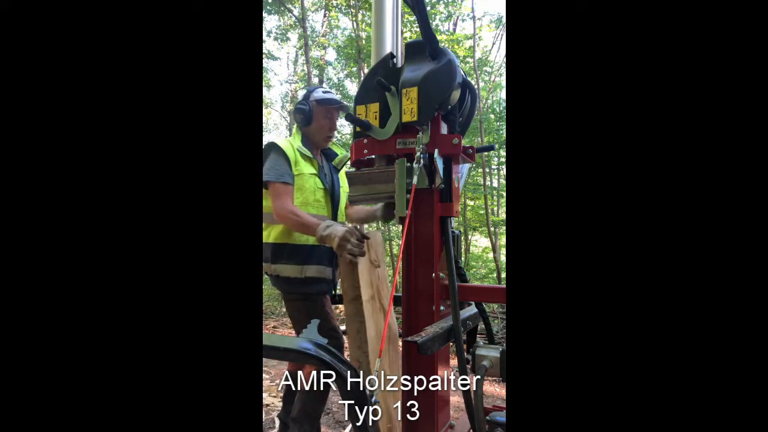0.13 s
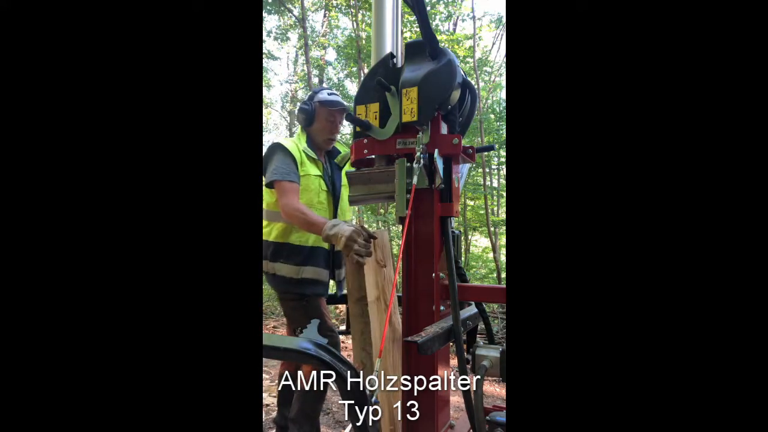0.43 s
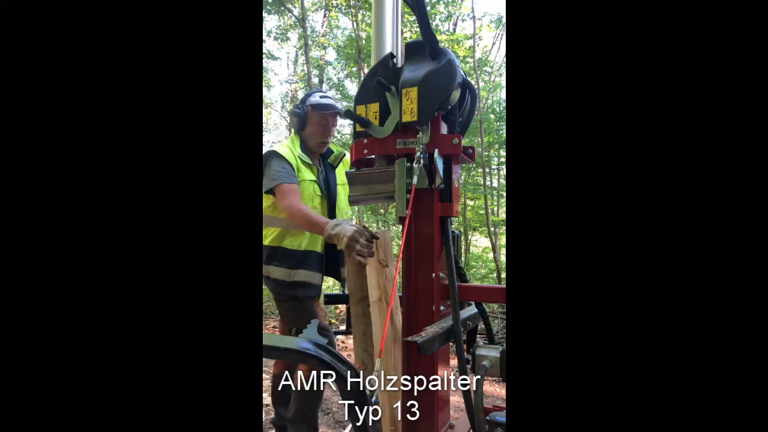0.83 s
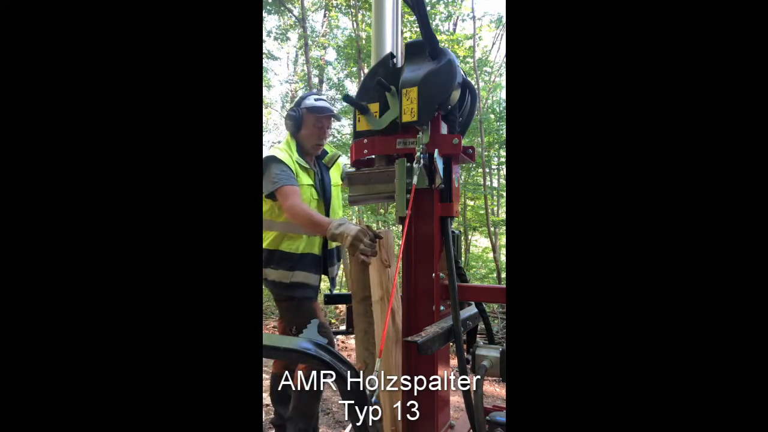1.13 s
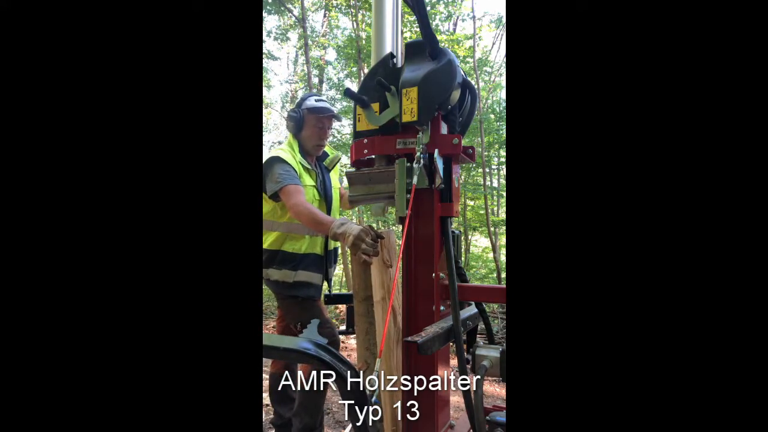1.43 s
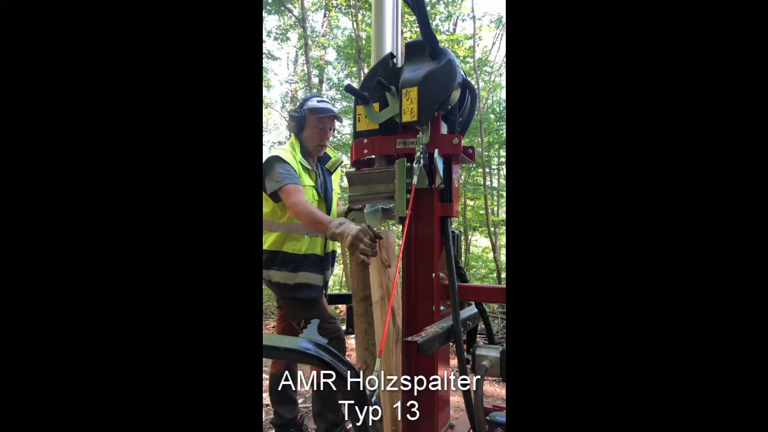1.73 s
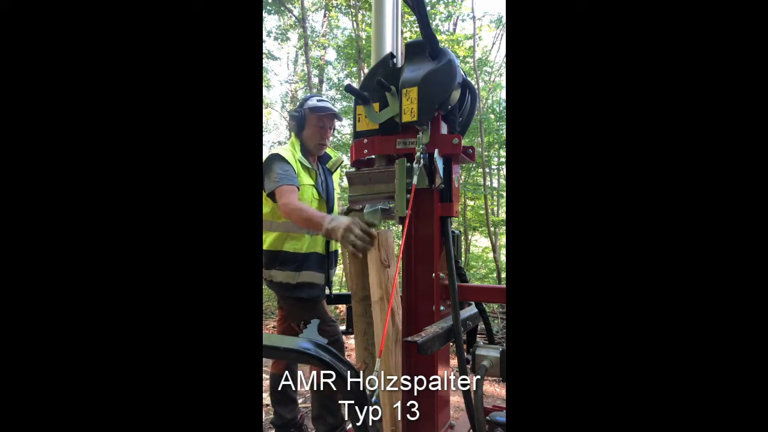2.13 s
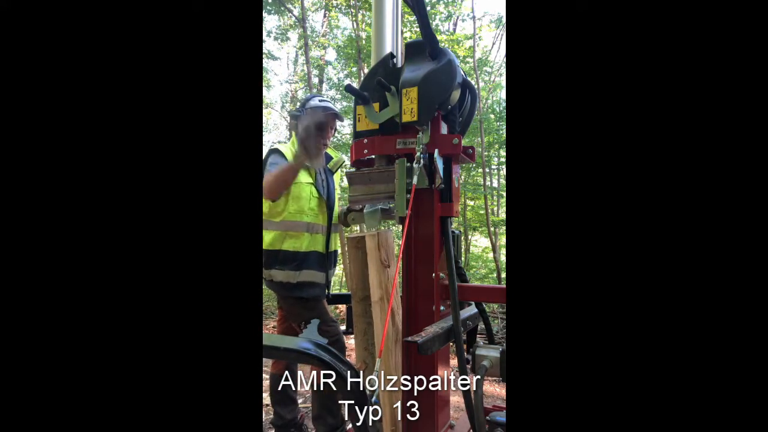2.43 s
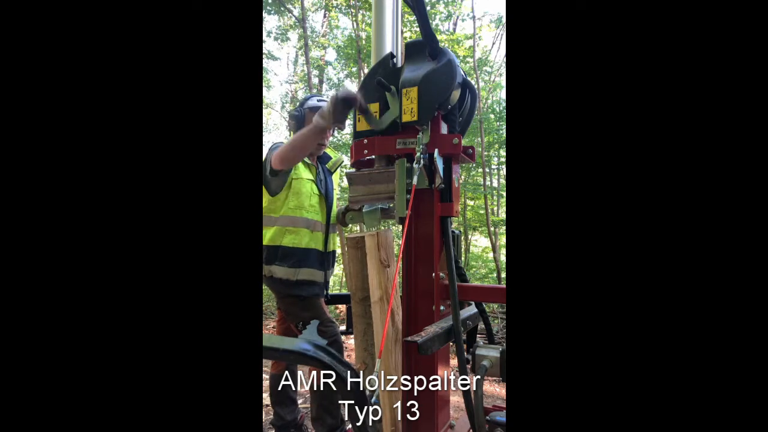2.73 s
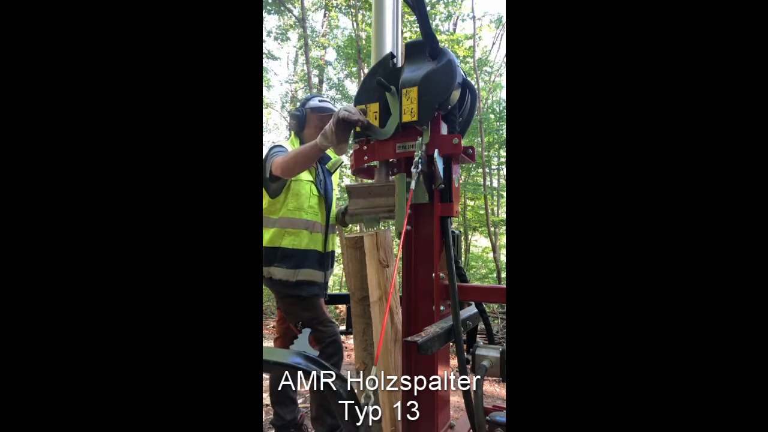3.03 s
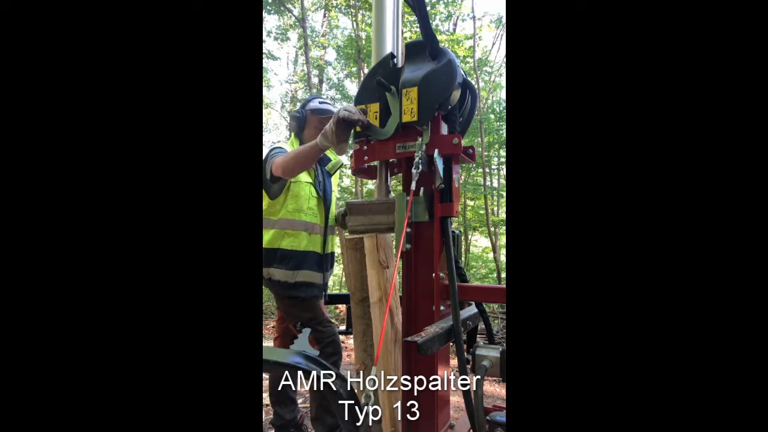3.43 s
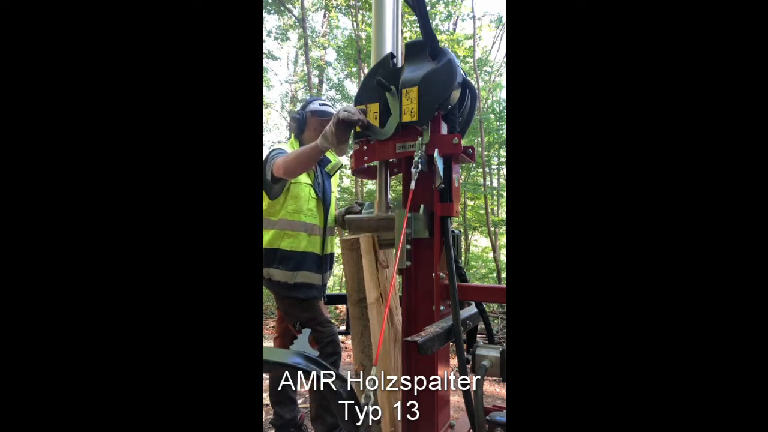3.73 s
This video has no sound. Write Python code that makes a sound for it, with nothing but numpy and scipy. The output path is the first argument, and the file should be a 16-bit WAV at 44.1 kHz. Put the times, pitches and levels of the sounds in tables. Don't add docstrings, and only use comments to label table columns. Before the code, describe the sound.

Log splitter engine chugs and whines, a lever clinks, oil hisses, and a log tears apart

```python
import sys
import numpy as np
from scipy import signal
from scipy.fft import irfft
from scipy.io import wavfile

SR = 44100
rng = np.random.default_rng(int(sys.argv[2]) if len(sys.argv) > 2 else 0)


def int16_out(signal):
    q = np.round(np.clip(np.atleast_2d(signal).T, -1, 1) * 32767)
    wavfile.write(sys.argv[1], SR, q.astype(np.int16))


def invert_db(x):
    u = np.asarray(x, float) / 20
    return 10 ** u


N = 170667

# time in seconds, speed in cycles per second.
ENGINE_SPEED = [
    (0, 11.508),
    (2.85, 11.508),
    (3.05, 11.33),
    (3.3, 11.1),
    (3.6, 10.8),
    (3.87, 10.5),
]
# time in seconds, load from 0 to 1.
HYDRAULIC_LOAD = [
    (0, 0.54),
    (2.72, 0.5),
    (2.9, 1),
    (3.1, 1),
    (3.4, 1),
    (3.87, 1),
]
# multiple of the cycle rate, level in dB.
EXHAUST_ORDERS = [(3, -47), (6, -29), (9, -37), (12, -39), (13, -40), (14, -48), (15, -42), (16, -48),
                  (18, -45), (20, -47), (21, -50), (22, -42), (23, -43), (24, -43), (25, -47), (35, -48),
                  (29, -47), (30, -42), (31, -50), (33, -51), (34, -51), (39, -50), (41, -50), (42, -49),
                  (43, -46), (44, -44), (45, -50)]
# multiple of the cycle rate, level in dB.
GEAR_AND_VALVE_ORDERS = [(47, -48), (48, -46), (50, -49), (51, -49), (52, -51), (59, -50), (62, -50), (64, -50),
                         (65, -49), (66, -53), (73, -52), (79, -51), (80, -49), (82, -51), (83, -47), (86, -49),
                         (90, -50), (94, -51), (101, -49), (105, -50), (108, -50), (114, -47), (118, -46), (125, -47),
                         (128, -52), (129, -47), (132, -49), (135, -51), (136, -51), (138, -52),
                         (147, -53), (149, -53), (151, -55), (154, -53), (159, -57), (166, -55), (171, -56),
                (175, -56), (177, -54), (179, -55), (182, -55), (189, -58), (196, -58), (205, -60),
                (212, -58), (227, -62), (268, -59), (277, -60)]
# frequency in Hz, level in dB.
CLATTER_SPECTRUM = [(150, -58), (400, -58), (900, -59), (1500, -59), (2000, -65), (3000, -70), (5000, -78)]
# frequency in Hz, level in dB per Hz.
NOISE_SPECTRUM = [(170, 1), (500, -7), (700, -16), (1400, -10.5), (2000, -17.5), (4000, -22.5), (9000, -30),
                  (15000, -35.5)]
# frequency in Hz, width in Hz, level in dB.
BLOCK_RESONANCES = [(3240, 120, -50.5), (12500, 200, -63), (2419, 61, -53)]
# time in seconds, pitch in Hz, level in dB.
PUMP_TONE = [(0, 1277.4, -35), (2.92, 1277.4, -35), (3.0, 1275, -41), (3.87, 1270, -42)]
# time in seconds, pitch in Hz, level in dB.
LOADED_WHINE = [(3.14, 556, -46), (3.19, 552, -34.5), (3.36, 542, -34.5), (3.45, 536, -42),
                (3.62, 528, -36), (3.7, 522, -41), (3.8, 513, -50)]
# start in seconds, end in
# seconds, pitch in Hz, level in dB, pitch sag as a share per second.
WHISTLES_AND_HUMS = [(2.82, 3.0, 3195, -43, .01), (2.84, 3.05, 2792, -42, 0), (2.83, 3.07, 2355, -48, 0),
                     (2.96, 3.09, 5165, -46, .02), (2.92, 3.08, 3915, -46, .02), (3.05, 3.43, 3910, -41, .05),
                     (3.0, 3.42, 4345, -45, .09), (2.95, 3.12, 1495, -42, .03), (3.12, 3.4, 1430, -44, .06),
                     (2.9, 3.42, 6600, -50, .01), (3.0, 3.42, 7380, -51, .08), (2.85, 3.4, 5860, -56, 0),
                     (3.25, 3.46, 3090, -49, .02), (3.13, 3.4, 2290, -50, .04), (3.13, 3.4, 5150, -53, .02),
                     (3.7, 3.8, 980, -39, .02), (3.5, 3.69, 1060, -40, 0), (3.55, 3.68, 1175, -41, 0),
                     (3.38, 3.46, 1900, -40, 0), (2.74, 2.87, 279, -30.5, .02), (3.04, 3.3, 207, -37, .08),
                     (3.57, 3.73, 195, -38, .05), (3.08, 3.35, 395, -42, .05)]
# start in seconds, peak in dB, pitch in Hz.
FIBRE_SNAPS = [(3.411, -13, 3830), (3.44, -4, 4600), (3.4527, -12, 2810), (3.4595, -7, 4430),
               (3.4635, -13, 7000), (3.4689, -9, 6490), (3.476, -18, 3200), (3.479, -7, 4400),
               (3.483, -7.5, 6800), (3.491, -13, 3940), (3.497, -10, 9000), (3.502, -7, 6440),
               (3.513, -13, 8300), (3.524, -12, 4870), (3.529, -13, 6800), (3.541, -10, 4020),
               (3.5445, -6.5, 8800), (3.5506, -7, 7000), (3.555, -9, 9000), (3.5628, -13, 9000),
               (3.5734, -12.5, 3600), (3.581, -5.5, 5295), (3.602, -14, 8950), (3.6233, -7, 7200),
               (3.6692, -10.5, 10300), (3.6722, -10.5, 9500), (3.6965, -15, 9000), (3.701, -16, 12000),
               (3.7077, -13, 2960), (3.726, -6.5, 6840), (3.749, -13, 2550), (3.7943, -15, 9000),
               (3.806, -11, 4430), (3.81, -14, 10100), (3.811, -8, 4560), (3.8255, -19, 6200),
               (3.8285, -18, 9000), (3.831, -23, 8000), (3.844, -23, 10000), (3.849, -11, 3020),
               (3.8655, -15, 7000)]
# time in seconds, level in dB.
TEARING_LEVEL = [(3.39, -58), (3.432, -35), (3.47, -24), (3.55, -26), (3.6, -32), (3.66, -35), (3.73, -32),
                 (3.8, -31), (3.87, -29)]
# start in seconds, peak in dB, pitch in Hz.
DULL_KNOCKS = [(2.81, -16, 580), (2.806, -21, 990), (2.75, -17, 400), (2.765, -19, 580), (2.865, -19, 570),
               (2.89, -21, 1000), (2.94, -15, 500), (3.015, -16, 570), (3.368, -16, 600),
               (3.372, -18, 1300), (3.378, -19, 900), (3.388, -15, 620), (3.395, -15, 430),
               (3.44, -19, 1280), (3.468, -15, 670), (3.5, -15, 950), (3.503, -18, 640), (3.554, -16, 650),
               (3.595, -20, 520), (3.685, -20, 1050), (3.73, -21, 1100), (3.746, -18, 650),
               (3.75, -20, 1280), (3.755, -19, 420), (3.806, -17, 1280), (3.816, -19, 1000),
               (3.848, -23, 1000)]
# start in seconds, peak in dB.
LEVER_CLINKS = [
    (1.679, -19),
    (1.694, -19),
    (2.735, -26),
    (2.806, -15),
    (2.811, -17),
]
# frequency in Hz, level in dB, 60 dB decay in seconds.
LEVER_MODES = [(2100, -9, .02), (3200, 0, .03), (4750, -3, .015), (5680, -3, .02), (7500, -2, .015),
               (8480, 0, .02), (8830, -1, .025), (9970, -5, .02), (11650, -9, .02)]
# start in seconds, depth in dB, recovery in seconds.
LIMITER_DIPS = [(3.445, 3, .05), (3.47, 4, .05), (3.50, 4, .05), (3.542, 9, .055), (3.67, 6, .015),
                (3.698, 5, .015), (3.729, 12, .055), (3.785, 5, .02), (3.794, 13, .04), (3.827, 18, .025),
                (3.852, 8, .04)]

FIRING_AT = .73
GEARS_FADE_PER_S, LOAD_GEARS_DB = .3, -14
LOAD_EXHAUST_DB, LOAD_NOISE_DB = 1, 4
WOBBLE_DB, PATCHY_DB, CLATTER_UNEVEN_DB = .5, .67, 3
NOISE_DB, NOISE_LOW_CUT_HZ, RUMBLE_DB = -33, 330, -56
KNOCK_DB, KNOCK_WIDTH = 2, 1
PUMP_SWELL, PUMP_SWELL_AT = .3, .255
OIL_HISS_DB, OIL_LOW_HZ, OIL_HIGH_HZ = -38.5, 2700, 8300
GROAN_DB = -33
WHISTLE_WAVER, WHISTLE_FLICKER_DB = .0006, 1.3
CRACK_OCTAVES, SNAP_T60_S = .2, .011
SNAP_DB, RING_DB = -4.5, -7.5
TEAR_PER_S, TEAR_UNEVEN_DB = 3000, 3.5
KNOCK_T60_S, KNOCK_SPREAD = .12, .08
DUCK_ATTACK_S, LEFT_DB, CUTOFF_HZ = .004, 6, 16350


def rms_one(x):
    return x / np.sqrt(np.mean(x ** 2) + 1e-20)


def in_time(rows):
    s, *columns = np.transpose(rows)
    return [np.interp(np.arange(N) / SR, s, c) for c in columns]


def at_hz(points, hz):
    table_hz, db = np.transpose(points)
    return np.interp(np.log(hz), np.log(table_hz), db)


def drift(rate):
    r = np.exp(-80 * np.pi * rate / SR)
    slow = signal.lfilter([1], [1, -2 * r, r * r], rng.standard_normal(N // 40 + 2002))[2000:]
    return np.interp(np.arange(N) / 40, np.arange(len(slow)), rms_one(slow))


def ring(x, hz, t60):
    r, w = invert_db(-60 / (t60 * SR)), 2 * np.pi * hz / SR
    return signal.lfilter([0, np.sin(w)], [1, -2 * r * np.cos(w), r * r], x + 1e-18)


def band(x, low_hz, high_hz):
    sos = signal.butter(2, [low_hz, min(high_hz, .45 * SR)], "band", fs=SR, output="sos")
    return signal.sosfilt(sos, x)


def narrow(hz, width_hz):
    t60 = np.log(1000) / np.pi / width_hz
    once = ring(rng.standard_normal(N), hz, t60)
    return rms_one(ring(once, hz, t60))


def tone(hz):
    return np.sqrt(2) * np.sin(2 * np.pi * np.cumsum(hz) / SR)


def burst(s, t60):
    t = np.arange(6000) / SR
    return int(s * SR), rng.standard_normal(6000) * invert_db(-60 * t / t60)


def looped(levels_db, phases, cycle):
    table = irfft(invert_db(levels_db) * np.exp(1j * phases), 8192) * 8192 / np.sqrt(2)
    return np.interp(cycle % 1 * 8192, np.arange(8193), np.append(table, table[0]))


def engine(load):
    speed, = in_time(ENGINE_SPEED)
    cycle = np.cumsum(speed) / SR - FIRING_AT
    sag = np.clip((speed[0] - speed) / GEARS_FADE_PER_S, 0, 1)
    out = engine_orders(cycle, sag, load) + engine_noise(cycle, load) + pump(cycle)
    return out + invert_db(RUMBLE_DB) * rms_one(band(rng.standard_normal(N), 38, 103))


def engine_orders(cycle, sag, load):
    orders = np.arange(4097)
    chance = rng.uniform(0, 2 * np.pi, 4097)
    exhaust, gears = np.full((2, 4097), -200.)
    for table, levels in (EXHAUST_ORDERS, exhaust), (GEAR_AND_VALVE_ORDERS, gears):
        levels[[int(k) for k, _ in table]] = [db for _, db in table]

    clatter = at_hz(CLATTER_SPECTRUM, np.clip(orders * ENGINE_SPEED[0][1], 1, None))
    clatter = clatter + rng.normal(0, CLATTER_UNEVEN_DB, 4097)
    clatter -= 200 * ((orders < 7) | (orders > 500))
    clatter[(exhaust > -150) | (gears > -150)] = -200

    exhaust_phases = chance * ((orders > 25) | (exhaust < -46))
    out = invert_db(LOAD_EXHAUST_DB * load) * looped(exhaust, exhaust_phases, cycle)
    gear_level = invert_db(LOAD_GEARS_DB * sag + WOBBLE_DB * drift(3.1))
    out += gear_level * looped(gears, chance, cycle)
    return out + looped(clatter, chance, cycle)


def engine_noise(cycle, load):
    firing = np.exp(KNOCK_WIDTH * (np.cos(6 * np.pi * cycle) - 1))
    puff = invert_db(KNOCK_DB * firing + LOAD_NOISE_DB * load)
    white = rng.standard_normal((2, N))
    edges = 150 * 2 ** np.arange(0, 7.1, .5)
    noise = 0
    for k, (lo, hi) in enumerate(zip(edges, edges[1:])):
        level = invert_db(at_hz(NOISE_SPECTRUM, np.sqrt(lo * hi)) + PATCHY_DB * drift(31))
        steady = puff if lo < 500 else 1
        noise = noise + level * band(white[k % 2], lo, hi) / steady
    noise = band(invert_db(NOISE_DB) * rms_one(noise), NOISE_LOW_CUT_HZ, .45 * SR)
    for hz, width_hz, db in BLOCK_RESONANCES:
        noise += invert_db(db + 2.6 * drift(3.7)) * narrow(hz, width_hz)
    return puff * noise


def pump(cycle):
    hz, db = in_time(PUMP_TONE)
    swell = 1 + PUMP_SWELL * np.cos(2 * np.pi * (cycle - PUMP_SWELL_AT))
    return invert_db(db + .5 * drift(5)) * swell * tone(hz)


def cracks():
    out = np.zeros(N + SR)
    for s, db, hz in FIBRE_SNAPS:
        i, spit = burst(s, SNAP_T60_S)
        pitched = band(spit, hz * 2 ** -CRACK_OCTAVES, hz * 2 ** CRACK_OCTAVES)
        wide = band(spit, 2800, 14000)
        snap = invert_db(RING_DB) * pitched / np.abs(pitched).max()
        snap += invert_db(SNAP_DB) * wide / np.abs(wide).max()
        out[i:i + len(spit)] += invert_db(db) * snap
    return out[:N]


def tearing():
    ticks = invert_db(TEAR_UNEVEN_DB * np.minimum(rng.exponential(1, N), 3)) * rng.choice([-1, 1], N)
    ticks *= rng.random(N) < TEAR_PER_S * invert_db(3 * drift(90)) / SR
    dealt = rng.integers(0, 16, N)
    grains = 0
    for k, hz in enumerate(np.geomspace(3000, 14000, num=16)):
        grains = grains + ring(ticks * (dealt == k), hz, 3.0 / hz)
    started = np.arange(N) > TEARING_LEVEL[0][0] * SR
    return invert_db(in_time(TEARING_LEVEL)[0]) * rms_one(grains) * started


def knocks():
    out = np.zeros(N + SR)
    for s, db, hz in DULL_KNOCKS:
        i, push = burst(s, .012)
        hit = 0
        for k in (-1, 0, 1.4):
            hit = hit + ring(push, hz * (1 + KNOCK_SPREAD * k), KNOCK_T60_S / (1 + abs(k)))
        out[i:i + len(hit)] += invert_db(db) * hit / np.abs(hit).max()
    return out[:N]


def levers():
    out = np.zeros(N + SR)
    for s, db in LEVER_CLINKS:
        i, rattle = burst(s, .04)
        hit = 13.0 * band(rattle, 2500, 12000)
        for hz, level, t60 in LEVER_MODES:
            hit += invert_db(level + rng.normal(0, 2)) * ring(rattle, hz, t60)
        out[i:i + len(hit)] += invert_db(db) * hit / np.abs(hit).max()
    return out[:N]


def hydraulics(load):
    t = np.arange(N) / SR
    hz, db = in_time(LOADED_WHINE)
    on = np.clip(np.minimum(t - LOADED_WHINE[0][0], LOADED_WHINE[-1][0] - t) / .037, 0, 1)
    out = on * invert_db(db + WHISTLE_FLICKER_DB * drift(4.7)) * tone(hz)
    hiss = rms_one(band(rng.standard_normal(N), OIL_LOW_HZ, OIL_HIGH_HZ))
    out += load * invert_db(OIL_HISS_DB + 1.5 * drift(27)) * hiss
    groan = rms_one(band(rng.standard_normal(N), 344, 1380))
    out += load * invert_db(GROAN_DB + 2.5 * drift(38)) * groan
    for start, end, hz, db, sag in WHISTLES_AND_HUMS:
        pitch = hz * (1 - sag * (t - start) + WHISTLE_WAVER * drift(20.5))
        on = np.clip(np.minimum(t - start, end - t) / .013, 0, 1)
        out += on * invert_db(db + WHISTLE_FLICKER_DB * drift(20)) * tone(pitch)
    return out


def limiter_gain():
    t = np.arange(N) / SR
    dip_db = np.zeros(N)
    for s, db, back in LIMITER_DIPS:
        fall, recovery = (t - s) / DUCK_ATTACK_S, 1.3 - 1.74 * (t - s) / back
        dip_db += db * np.clip(np.minimum(fall, recovery), 0, 1)
    return invert_db(-dip_db)


def scene():
    load = np.clip(in_time(HYDRAULIC_LOAD)[0], 0, 1.5)
    steady = engine(load) + hydraulics(load) + tearing()
    hits = levers() + knocks() + cracks()
    left = invert_db(LEFT_DB) * (steady * limiter_gain() + hits)
    return np.array([left, 0 * left])


def top_cut(x):
    return signal.sosfilt(signal.butter(12, 16900, fs=SR, output="sos"), x)


def record(dry):
    rounded = .95 * np.tanh(dry / .95)
    low_pass = signal.cheby2(16, 70, CUTOFF_HZ, fs=SR, output="sos")
    mix = signal.sosfilt(low_pass, rounded)
    return top_cut(mix)


dry = scene()
out = record(dry)
int16_out(out)
```